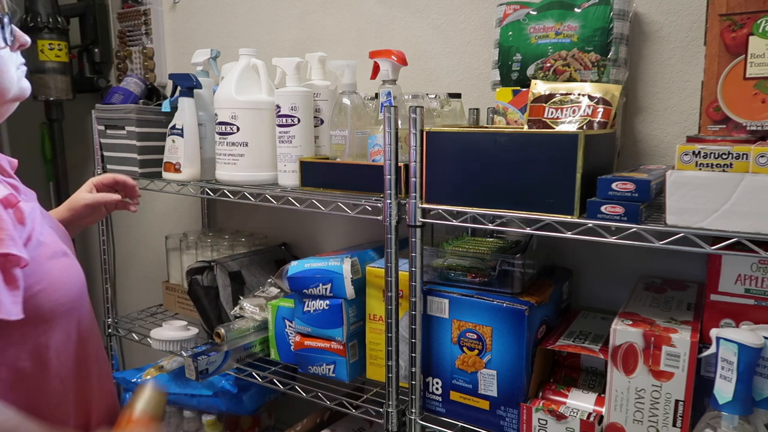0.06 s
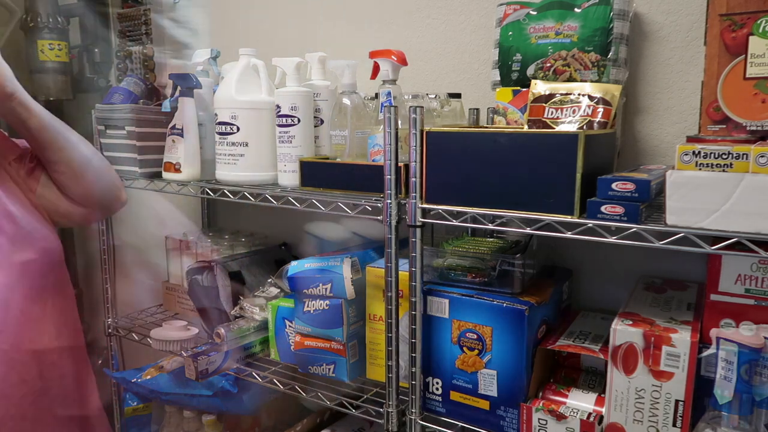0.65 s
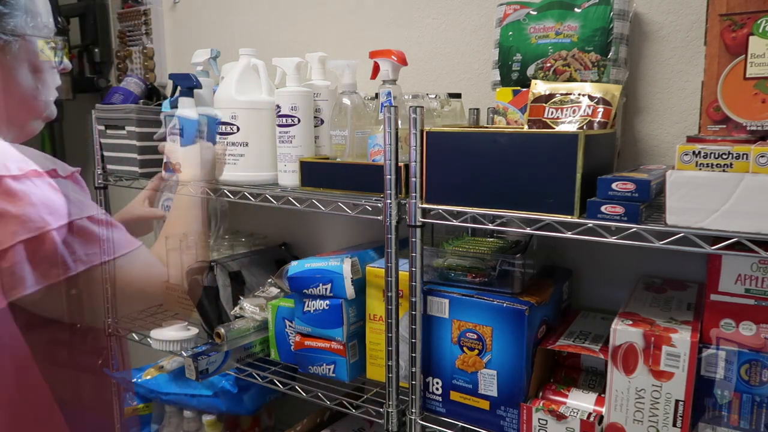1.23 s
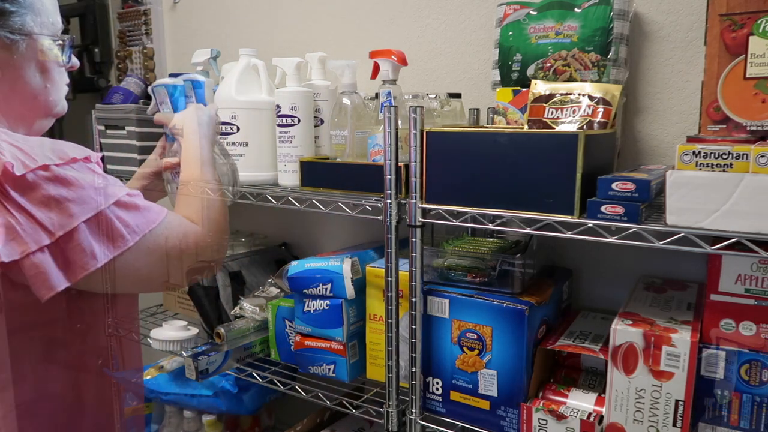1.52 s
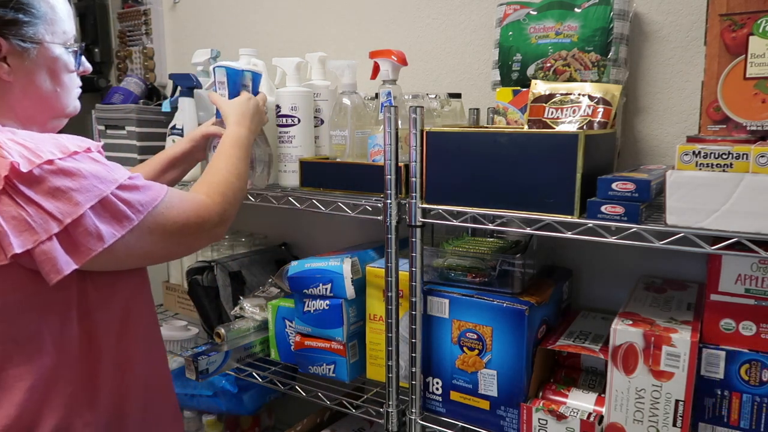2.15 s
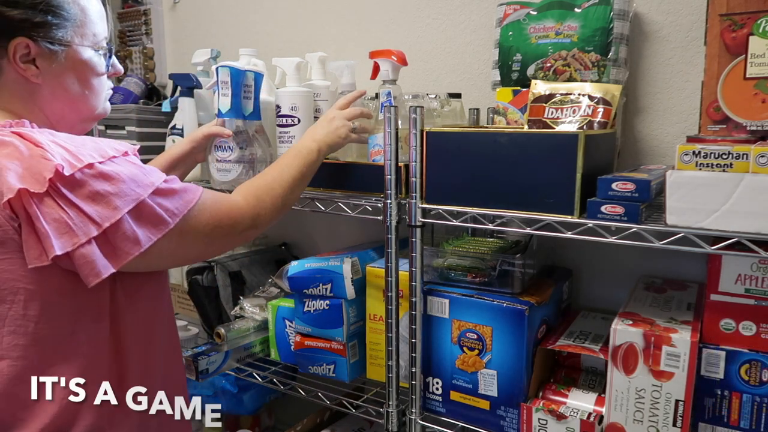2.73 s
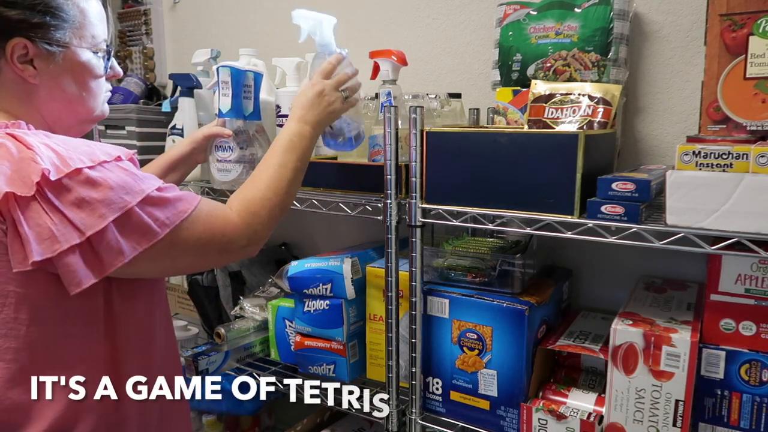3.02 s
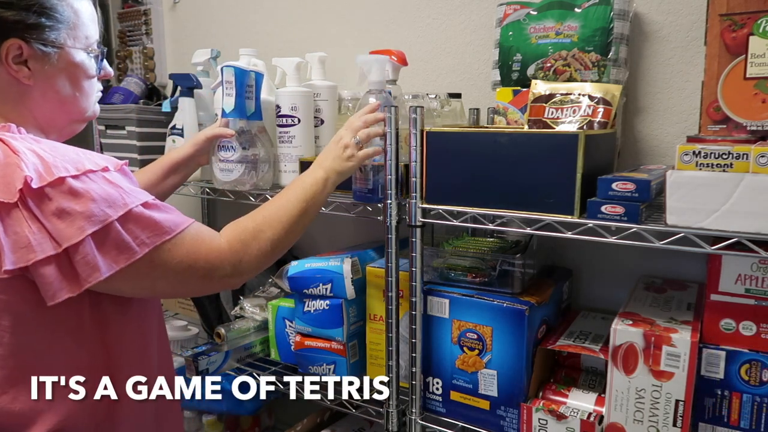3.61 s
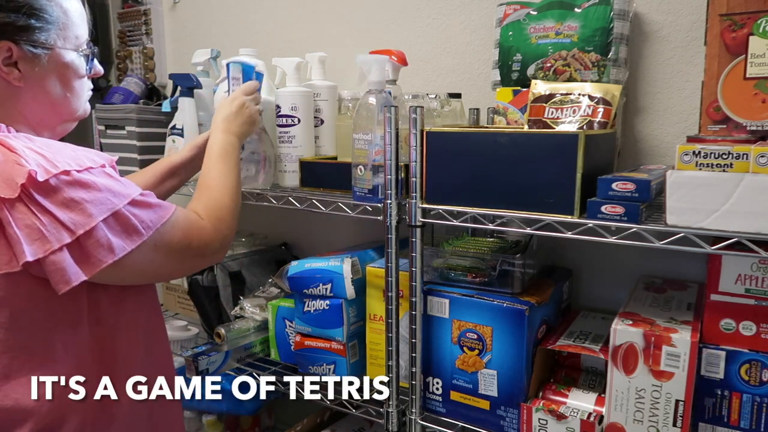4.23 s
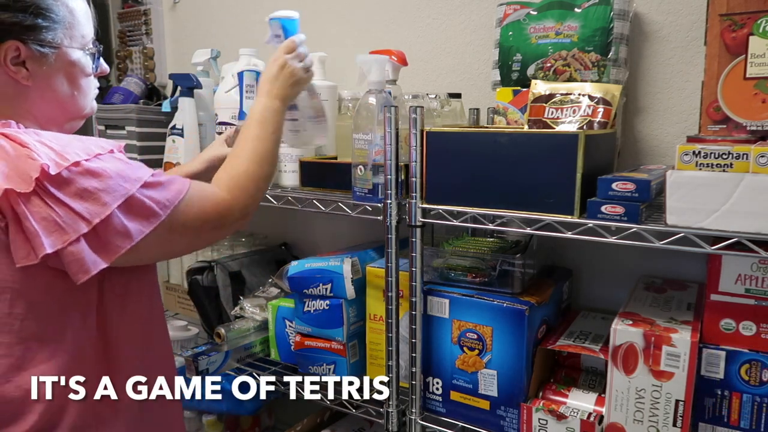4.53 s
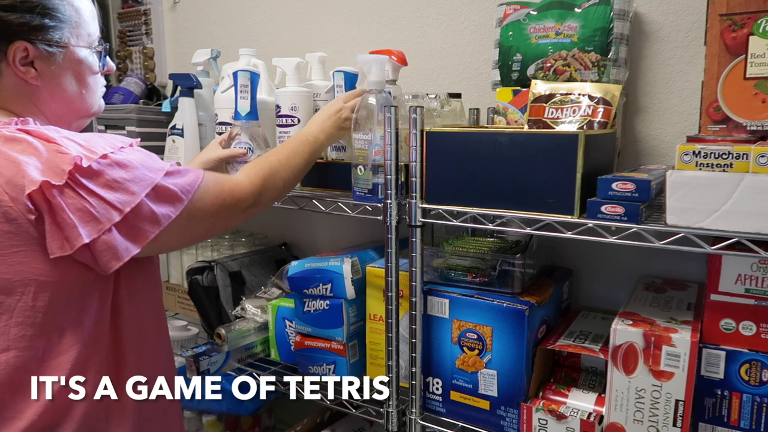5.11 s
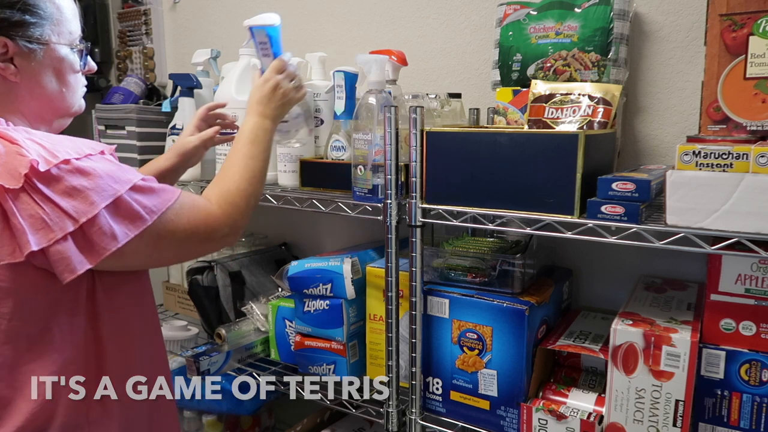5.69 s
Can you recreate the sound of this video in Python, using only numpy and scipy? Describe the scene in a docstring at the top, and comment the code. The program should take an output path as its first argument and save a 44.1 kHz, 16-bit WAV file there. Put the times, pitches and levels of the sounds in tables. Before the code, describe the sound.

In a small pantry, a machine hums low and steady while plastic scrapes faintly on a wire shelf. Plastic bottles are then nudged, slid and set down nearby in irregular clusters of hollow knocks, with small crackles of thin plastic. Heavier landings leave the shelf droning softly. The last bottle lands loudest, followed by a short rasping slide and a sharp plastic snap.

```python
"""A machine's steady rumble and hum come first, with faint scrapes of plastic on a steel wire shelf.
Bottles in a small pantry are then lifted, nudged, slid and set down, the last landing the loudest.
Each impact excites the resonances of a thin shell and of the room; heavy ones leave the shelf droning.
Sliding bottles rasp by stick-slip friction, and squeezed panels buckle with a ping."""
import sys
import numpy as np
from scipy import signal
from scipy.fft import rfft, irfft, next_fast_len
from scipy.io import wavfile
from scipy.ndimage import uniform_filter1d, minimum_filter1d, map_coordinates

SR = 44100
rng = np.random.default_rng(int(sys.argv[2]) if len(sys.argv) > 2 else 0)


def waveform_to_disk(signal):
    """Save audio, clipped to [-1, 1], as 16-bit WAV at the path in sys.argv[1]."""
    frames = np.transpose(np.atleast_2d(signal))
    scaled = np.clip(frames, -1, 1) * 32767
    samples = np.round(scaled).astype(np.int16)
    wavfile.write(sys.argv[1], SR, samples)


N = 258426

# spectra of the machine's rumble and of moving air: frequency_hz, gain_db
RUMBLE_SPECTRUM = [(12, -50), (20, -12), (76, -2), (96, -6), (125, -3), (147, -6), (162, -15), (189, -9.5),
                   (208, -20), (268, -20), (289, -19), (348, -26.5), (400, -31), (520, -52), (880, -120)]
AIR_SPECTRUM = [(180, -37), (300, -14), (353, -1), (657, -9.5), (1330, -12), (3360, -17), (8390, -29),
                (13000, -37.5), (14900, -53)]
# pantry resonances that colour the air: centre_hz, width_hz, lift_db
AIR_MODES = [(820, 90, 3), (1060, 70, -4), (1320, 70, 4.5), (3480, 200, 2)]
# motor tones and a faint electric whine: pitch_hz, rms_db
HUM_TONES = [(74.5, -52.5), (115, -55)]
WHINE_TONES = [(13020, -86)]
# stereo width of the background and of the room response: frequency_hz, side_gain_db
BACKGROUND_WIDTH = [(60, -29), (110, -28), (200, -6), (400, 1), (2300, -3.5), (7800, -1), (14400, 7.5)]
ROOM_WIDTH = [(100, -43), (400, -23.5), (3300, -15), (4200, -5), (7500, 2.5), (11000, 8.5), (14500, 18)]
# reverberation time: frequency_hz, t60_s
ROOM_T60 = [(100, 0.52), (260, 0.43), (700, 0.33), (1840, 0.3), (4850, 0.34), (12000, 0.45)]
# colour of the reverberation: frequency_hz, gain_db
ROOM_SPECTRUM = [(150, 10.5), (500, 9), (1500, 1), (6000, -1.5)]

# modes of the wire shelf: pitch_hz, level_db, t60_s
SHELF_MODES = [(180, -48.5, 2.4), (203.5, -42, .7)]
# weight landing on the shelf: start_s, gain_db
SHELF_LOADS = [(1.998, 3), (2.24, 1), (3.36, 4.5), (4.19, -0.5), (4.983, -4)]
# spectra of a thin shell when dragged and when struck: frequency_hz, gain_db
SCRAPE_SPECTRUM = [(100, -13.5), (350, -14.5), (600, -13.5), (1200, -8), (1800, -4.5), (2600, -4.5),
                   (4200, -7), (7000, -14.5), (10000, -21.5), (13000, -33), (15000, -45)]
KNOCK_SPECTRUM = [(50, -64), (110, -2.5), (190, -1.5), (400, 1), (1000, 0.5), (2000, -2), (3000, -6.5),
                  (4000, -11.5), (5000, -16), (7000, -26.5), (10000, -38.5), (15000, -61)]
# resonances of a dragged shell and of the three struck bottles: centre_hz, width_hz, lift_db
SCRAPE_MODES = [(1520, 150, 3), (2050, 150, 6.5), (2650, 200, 2), (3250, 300, 3.5)]
TALL_MODES = [(385, 24, 5), (480, 30, 2.5), (662, 30, 8.5), (745, 20, 4), (1036, 22, 7), (1158, 40, 5.5),
              (1323, 28, 8.5), (1550, 90, -4), (1835, 50, 4), (1970, 90, 6.5), (2650, 90, 3.5)]
SPRAY_MODES = [(170, 44, 6), (385, 45, 4), (500, 70, 3), (660, 40, 2), (820, 45, 2.5), (1045, 50, 4),
               (1130, 70, -5), (1310, 40, 4), (1470, 50, 4), (2040, 50, 4), (2170, 50, 3), (2420, 90, 5),
               (2780, 120, 2), (3360, 220, 6), (3720, 180, -4), (4100, 300, 2)]
NEIGHBOUR_MODES = [(493, 80, 11), (690, 80, -4), (828, 80, 11), (1157, 66, 10.5), (1320, 40, 9),
                   (1850, 110, 3), (2060, 150, 6.3), (3540, 290, 9)]
# slides over wires and neighbours: start_s, length_s, final_db, fade_t60_s, treble_db
SLIDES = [(0.02, .08, -56.5, .3, 0), (0.2, .09, -61, .2, -2), (1.06, .08, -63, .6, 0),
          (1.3, .02, -60, .15, 0), (1.39, .05, -61, .35, 0), (1.515, .04, -53.5, .22, -4),
          (1.625, .08, -47, .09, -.5), (2.175, .225, -49.3, .11, 1), (2.715, .06, -55.5, .4, 0),
          (2.92, .06, -59.5, .24, 0), (3.22, .02, -62, .2, 0), (4.07, .11, -51.5, .13, 2),
          (4.18, .024, -41.5, .06, 4.5), (4.47, .14, -64, .3, -1), (4.715, .02, -60, .2, 0),
          (5.423, .075, -35.3, .22, -1.5), (5.509, .02, -31.8, .3, -.5), (5.55, .055, -41, .3, 0),
          (5.71, .02, -57, .2, 4)]
# squeezed panels snapping through, and a dragged bottle's shell ringing out: start_s, peak_db, pitch_hz, t60_s
SNAPS = [(0.843, -55, 1330, .06), (1.6385, -39, 3300, .012), (1.6447, -23.5, 1860, .014),
         (1.6465, -33, 3300, .012), (1.682, -36, 1830, .016), (1.6995, -33, 1780, .014),
         (5.527, -22, 2300, .005), (5.529, -33, 2035, .3), (5.568, -31, 3200, .014)]
# boom of the body and ring of the walls after a landing: start_s, pitch_hz, level_db, t60_s
HOLLOW_NOTES = [(1.996, 174, -31, .26), (2.911, 505, -38, .25), (2.926, 400, -30.5, .24),
                (3.010, 655, -32, .2), (3.010, 850, -32, .18), (3.356, 1065, -17, .05),
                (3.362, 176, -25, .22), (3.364, 381, -19.5, .2), (3.443, 175, -24.5, .28),
                (3.443, 813, -30, .22), (3.443, 1312, -28, .2), (3.444, 1850, -31, .2),
                (3.522, 362, -35, .24), (4.985, 211, -30, .4), (4.985, 272, -31, .35),
                (4.985, 397, -28, .35), (4.983, 1159, -21, .28)]
# single taps on the bottles, a neighbour or the wires: start_s, level_db, thump_db, hardness_db, panel_hz,
# dry_db, bottle
TAPS = [(0.63, -44, -9, 17, 4500, 1, "neighbour"), (1.613, -35, -12, 18, 3000, 3, "neighbour"),
        (1.640, -28, -14, 7, 1230, 2, "neighbour"), (1.6445, -21, -24, 9.5, 3300, 2, "neighbour"),
        (1.676, -33, -24, 8, 3750, 2, "neighbour"), (2.234, -26.5, -14, -2, 2000, 1.5, "neighbour"),
        (2.238, -23.5, -14, -3, 1300, 2, "neighbour"), (2.382, -29.5, -22, 6, 900, 3, "neighbour"),
        (2.7225, -35, -2.5, 3, 580, 2, "spray"), (2.764, -33, 3, 4, 1520, 3, "spray"),
        (2.773, -32, -6, 5, 2100, 4, "spray"), (2.791, -30, -4, -4.5, 585, 3, "spray"),
        (2.851, -27, -5, 2, 2500, 3, "spray"), (2.860, -33, -3, 6, 3800, 3, "spray"),
        (2.875, -30, 0, -4, 700, 4, "spray"), (3.030, -22.5, 2, -3, 560, 4, "spray"),
        (3.5172, -18.5, -11, 3.5, 3100, 2, "spray"), (3.519, -17.5, -11, 3.5, 2400, 2, "spray"),
        (3.620, -38.3, -3, -4, 690, 1, "spray"), (4.1868, -23.5, -3, 6, 955, 3, "neighbour"),
        (4.9445, -25, -5, 7, 820, 1, "tall"), (5.384, -27, -3, 4.5, 1600, 1, "tall"),
        (5.396, -31.5, -2.7, -9.5, 930, 1, "tall"), (5.5266, -16, -10, 16, 2590, 2, "neighbour"),
        (5.571, -25, -8, 13, 2300, 1, "neighbour")]
# bottles set down, rim first: start_s, rim_to_base_s, level_db, rim_gain_db, thump_db, hardness_db,
# crack_db, thud_db, panel_hz, panel_db, dry_db, bottle
LANDINGS = [(1.990, .006, -18, -6, -5, 0, 0, -34, 950, 5, 0, "tall"),
            (2.909, .001, -19, -7, -14, -3, -4, -52, 2550, 7, 3.5, "spray"),
            (3.009, .001, -14, -7, -14, -2, -1, -50, 4350, 5, 3, "spray"),
            (3.3497, .008, -8.5, -2, -3.5, 0, -6, -28, 1070, 8, 0, "spray"),
            (3.441, .002, -5.5, -6, -10, -1.5, -4.5, -37, 4200, 4, .5, "spray"),
            (4.9812, .0036, 3.7, -7, -11.5, 1, -2.5, -44, 3000, 2, -.6, "tall")]

PANEL_DB, CRACK_DB = 6.3, -4  # panel resonance and treble of a plain touch
RIM_HARDER_DB, RIM_THUMP_DB = 4.6, 8.7  # the rim is brighter than the base and flexes the shell more
BASE_DRY_DB = 1.8  # the flat base slaps all at once and stands clear of the room
SETTLE_S, SETTLE_HASTE = .0067, .51  # base to thud for a 0 dB landing; a gentler one settles later
THUD_THUMP_DB, THUD_HARDNESS_DB, THUD_HZ = 7.6, -14.3, 172  # settling contents: heavy and dull


def amp(db):
    """Amplitude ratio of a level in decibels."""
    return 10 ** (np.asarray(db) / 20)


def unit(x):
    """Normalisation to an rms of 1."""
    return x / np.sqrt(np.mean(x ** 2) + 1e-20)


def along(points, hz):
    """Interpolation of (frequency_hz, value) points on a logarithmic frequency axis."""
    frequencies, values = np.transpose(points)
    return np.interp(np.log(hz + 1), np.log(frequencies + 1), values)


def bell(hz, centre_hz, width_hz, db):
    """A resonance as a Lorentzian bump in decibels."""
    return db / (1 + (2 * (hz - centre_hz) / width_hz) ** 2)


def resonant(spectrum, modes, hz):
    """Gains in cascade add in decibels: a broad spectrum plus its resonances."""
    return along(spectrum, hz) + sum(bell(hz, *mode) for mode in modes)


def wobble(rate_hz):
    """Smooth random modulation: a spline through Gaussian knots."""
    knots = rng.standard_normal(int(N * rate_hz / SR) + 4)
    return map_coordinates(knots, [np.arange(N) * rate_hz / SR])


def coloured(x, spectrum):
    """Zero-phase filtering by a curve of (frequency_hz, gain_db) points."""
    n = x.shape[-1]
    size = next_fast_len(n + 8192)
    gain = amp(along(spectrum, np.fft.rfftfreq(size, 1 / SR)))
    return irfft(rfft(x, size) * gain, size)[..., :n]


def whiten(x, width_hz):
    """Whitening: energy is spread evenly over frequency on scales wider than width_hz."""
    n = x.shape[-1]
    spectrum = rfft(x, 2 * n)
    power = abs(uniform_filter1d(abs(spectrum) ** 2, max(1, int(width_hz * 2 * n / SR))))
    return irfft(spectrum / np.sqrt(power + 1e-12))[..., :n]


def minimum_phase(db):
    """Folding the cepstrum gives an impulse response that starts at once and rings out."""
    cepstrum = irfft(np.log(amp(db)))
    half = len(cepstrum) // 2
    cepstrum[1:half] *= 2
    cepstrum[half + 1:] = 0
    return irfft(np.exp(rfft(cepstrum)))


def add(track, start_s, sound):
    """Superposition of a sound on a track."""
    part = track[..., round(start_s * SR):][..., :sound.shape[-1]]
    part += sound[..., :part.shape[-1]]


def ring(hz, t60_s, rise_s, length_s=.5):
    """A damped mode: a sinusoid that swells and decays exponentially."""
    t = np.arange(round(length_s * SR)) / SR
    return np.sin(2 * np.pi * (hz * t + rng.random())) * amp(-60 * t / t60_s) * (1 - np.exp(-t / rise_s))


def wavering(tones):
    """Random amplitude and phase modulation make steady tones waver."""
    t = np.arange(N) / SR
    return sum(amp(db) * unit(amp(1.8 * wobble(11)) * np.sin(2 * np.pi * hz * t + .77 * wobble(7.9)))
               for hz, db in tones)


def machine_and_air(rumble_db=-44.8, air_db=-56.8, swell_db=.3):
    """Line spectra over broadband noise: hum and rumble swell together beside air hiss and a whine."""
    swell = amp(swell_db * wobble(1.2))
    rumble = swell * amp(rumble_db) * unit(coloured(rng.standard_normal((2, N)), RUMBLE_SPECTRUM))
    hz = np.fft.rfftfreq(4096, 1 / SR)
    air_colour = np.column_stack([hz, resonant(AIR_SPECTRUM, AIR_MODES, hz)])
    air = amp(air_db + .4 * wobble(12)) * unit(coloured(rng.standard_normal((2, N)), air_colour))
    mid, side = rumble + air
    mid = mid + swell * wavering(HUM_TONES) + wavering(WHINE_TONES)
    return np.array([mid, coloured(side, BACKGROUND_WIDTH)])


def pantry(room_db, near_db=-2, direct_db=-4.5, near_t60_s=.012, near_rise_s=.0013, build_s=.002):
    """Room impulse response, mid and side: direct sound, scattering off the shelf, reverberation."""
    t = np.arange(SR * 2 // 5) / SR
    near_envelope = amp(-60 * t / near_t60_s) * (1 - np.exp(-t / near_rise_s))
    near = whiten(rng.standard_normal((2, len(t))) * near_envelope, width_hz=900)
    hz, frame_s, bands = signal.stft(rng.standard_normal((2, len(t))), SR, nperseg=256)
    decay = amp(-60 * frame_s / along(ROOM_T60, hz)[:, None])
    tail = signal.istft(bands * decay, SR, nperseg=256)[1][:, :len(t)]
    wall = amp(1.8 * np.exp(-((t - .016) / .005) ** 2))  # the nearest wall answers after 16 ms
    tail = whiten(tail * wall * (1 - np.exp(-t / build_s)), width_hz=220)
    mid, side = amp(near_db) * near + amp(room_db) * coloured(tail, ROOM_SPECTRUM)
    mid[0] += amp(direct_db)
    return np.array([mid, coloured(side, ROOM_WIDTH)])


def shelf_drone():
    """Free vibration: the lightly damped wire deck rings on after taking a load."""
    out = np.zeros(N)
    for start_s, load_db in SHELF_LOADS:
        drone = sum(amp(db) * ring(hz, t60_s, rise_s=.023, length_s=2) for hz, db, t60_s in SHELF_MODES)
        add(out, start_s, amp(load_db) * drone)
    return out


def slide_envelope(start_s, length_s, final_db, fade_t60_s, grip_s=.02, press_db_per_s=25):
    """Friction noise follows the force: the hand takes hold, presses on and lets go."""
    t = np.arange(N) / SR - start_s
    shape_db = np.minimum(press_db_per_s * (t - length_s), -60 * (t - length_s) / fade_t60_s)
    return np.clip(t / grip_s, 0, 1) * amp(final_db + shape_db)


def sliding(slips_per_s=3500, spread_db=2.8, catch_db=2):
    """Stick-slip friction: a dense run of tiny impulses rings the shell of a dragged bottle."""
    hz = np.fft.rfftfreq(8192, 1 / SR)
    shell = minimum_phase(resonant(SCRAPE_SPECTRUM, SCRAPE_MODES, hz))
    slipping = rng.random(N) < slips_per_s / SR
    slips = slipping * rng.standard_normal(N) * amp(spread_db * rng.standard_normal(N))
    catching = amp(catch_db * wobble(110))  # uneven grip on the wires
    rub = unit(signal.fftconvolve(slips * catching, shell)[:N])
    treble = coloured(rub, [(2500, -40), (5000, 0)])
    scrape = sum(slide_envelope(*shape) * (rub + (amp(treble_db) - 1) * treble)
                 for *shape, treble_db in SLIDES)
    out, hop = np.zeros((2, N)), SR // 20
    # the bottle travels, so the room answers each short stretch differently
    for start in range(0, N - 2 * hop, hop):
        stretch = scrape[start:start + 2 * hop] * np.sqrt(np.hanning(2 * hop))
        if stretch.any():
            room = pantry(room_db=-1)
            room /= np.linalg.norm(room[0])
            add(out, start / SR, signal.fftconvolve(stretch[None], room, axes=1))
    return out


def panel_snaps():
    """Short pings: thin plastic snaps through under the fingers, or a dragged bottle's shell rings out, and the
    room echoes each ping."""
    out = np.zeros((2, N))
    for start_s, peak_db, hz, t60_s in SNAPS:
        ping = ring(hz, t60_s, rise_s=.0006)
        echoed = signal.fftconvolve(ping[None], pantry(room_db=-14, near_db=-11), axes=1)
        add(out, start_s, amp(peak_db) * echoed / abs(echoed[0]).max())
    return out


def hollow_notes():
    """Modal decay: a few modes of a bottle's body and walls outlast its landing."""
    out = np.zeros(N)
    for start_s, hz, level_db, t60_s in HOLLOW_NOTES:
        add(out, start_s, amp(level_db) * ring(hz, t60_s, rise_s=.004))
    return out


def contacts():
    """Impact sequence: a tap is one blow; a landing is three, from rim, base and settling contents."""
    blows = [(*tap, PANEL_DB, CRACK_DB, bottle, dry_db) for *tap, dry_db, bottle in TAPS]
    for (start_s, rim_to_base_s, level_db, rim_gain_db, thump_db, hardness_db,
         crack_db, thud_db, panel_hz, panel_db, dry_db, bottle) in LANDINGS:
        base_s = start_s + rim_to_base_s
        settle_s = base_s + SETTLE_S * amp(-SETTLE_HASTE * level_db)
        shell = (panel_hz, panel_db, crack_db, bottle)
        rim = (start_s, level_db + rim_gain_db, thump_db + RIM_THUMP_DB, hardness_db + RIM_HARDER_DB,
               *shell, dry_db)
        base = (base_s, level_db, thump_db, hardness_db, *shell, dry_db + BASE_DRY_DB)
        thud = (settle_s, thud_db, THUD_THUMP_DB, THUD_HARDNESS_DB, THUD_HZ,
                PANEL_DB, CRACK_DB, bottle, 0)
        blows += [rim, base, thud]
    return blows


def knocks(panel_q=8, crack_per_hardness=1.15):
    """Impulse excitation of a shell: weight adds bass thump, a harder contact adds clack and crack."""
    out, hz = np.zeros((2, N)), np.fft.rfftfreq(8192, 1 / SR)
    modes = {"tall": TALL_MODES, "spray": SPRAY_MODES, "neighbour": NEIGHBOUR_MODES}
    for blow in contacts():
        start_s, level_db, thump_db, hardness_db, panel_hz, panel_db, crack_db, bottle, dry_db = blow
        body_db = resonant(KNOCK_SPECTRUM, modes[bottle], hz)
        treble_db = crack_db + crack_per_hardness * hardness_db
        touch_db = along([(330, thump_db), (900, 0), (2200, hardness_db), (6000, treble_db)], hz)
        struck_panel_db = bell(hz, panel_hz, panel_hz / panel_q, panel_db)
        knock = minimum_phase(body_db + touch_db + struck_panel_db)
        knock *= amp(level_db) / abs(knock).max()
        room = pantry(room_db=.3 - .2 * level_db - dry_db)  # lighter touches are more diffuse
        add(out, start_s, signal.fftconvolve(knock[None], room, axes=1))
    return out


def scene():
    """The sources superpose in mid and side; sum and difference give left and right."""
    mid, side = knocks() + panel_snaps() + sliding() + machine_and_air()
    mid = mid + hollow_notes() + shelf_drone()
    return np.array([mid + side, mid - side])


def record(dry, ceiling=.98, cutoff_hz=15050):
    """Peak limiting and band limiting: the gain dips briefly at high peaks, then a low-pass follows."""
    needed_gain = 1 / np.maximum(1, abs(dry).max(axis=0) / ceiling)
    gain = uniform_filter1d(minimum_filter1d(needed_gain, size=91), size=45)
    size = next_fast_len(N + SR // 2)
    passband = np.fft.rfftfreq(size, 1 / SR) < cutoff_hz
    return irfft(rfft(dry * gain, size) * passband, size)[:, :N]


dry = scene()
out = record(dry)
waveform_to_disk(out)
```